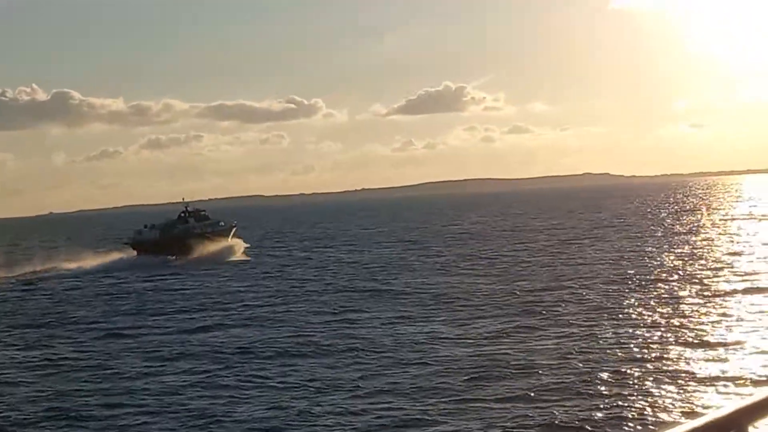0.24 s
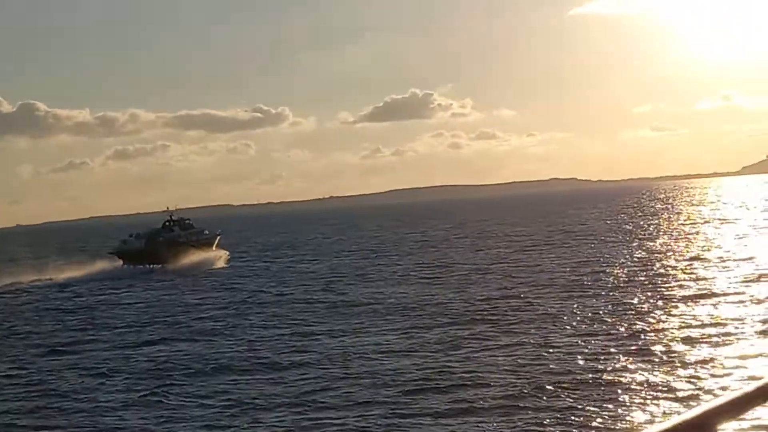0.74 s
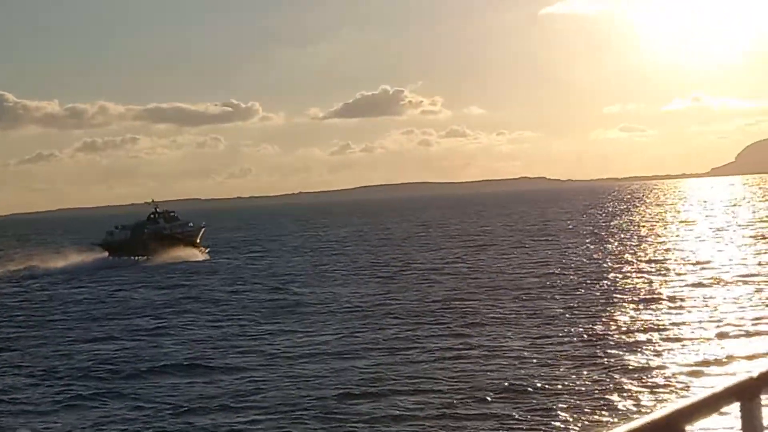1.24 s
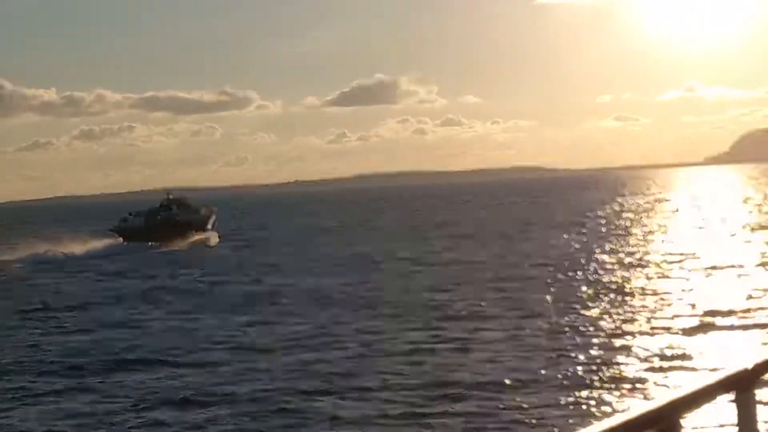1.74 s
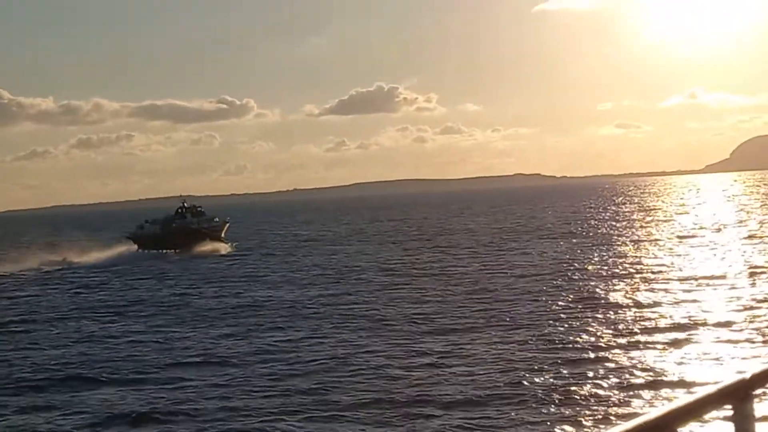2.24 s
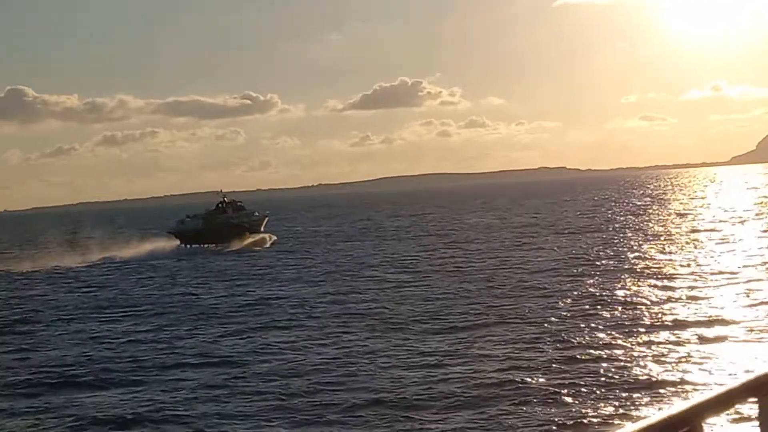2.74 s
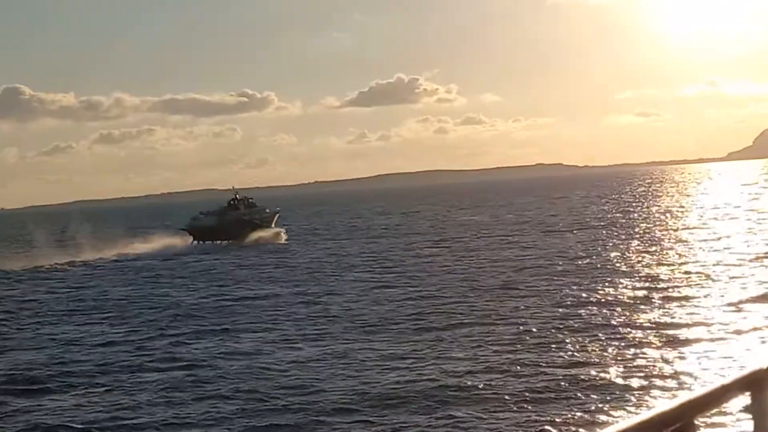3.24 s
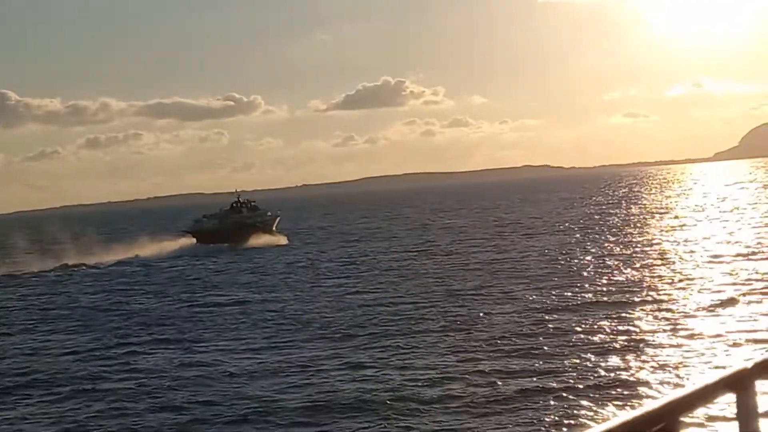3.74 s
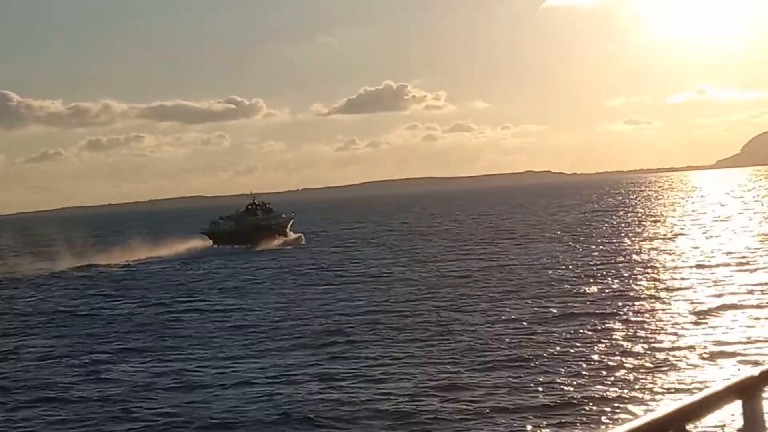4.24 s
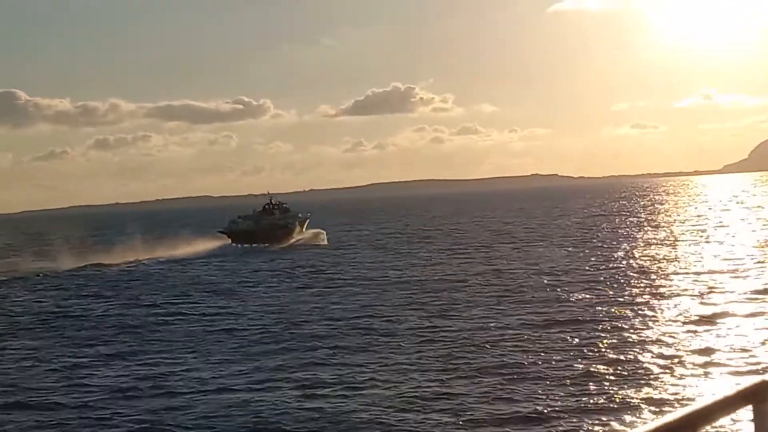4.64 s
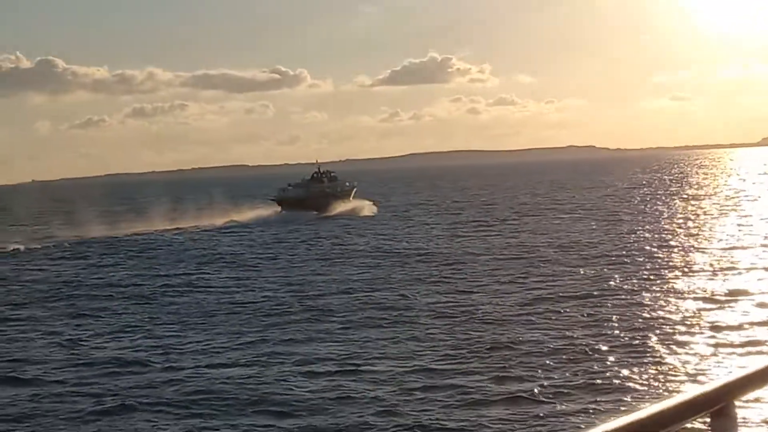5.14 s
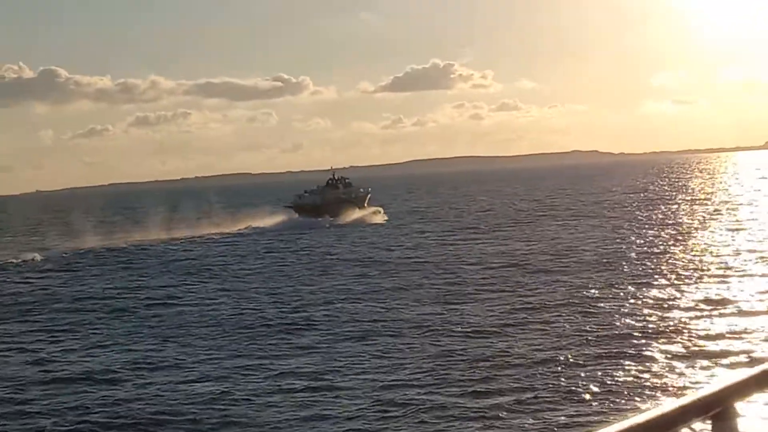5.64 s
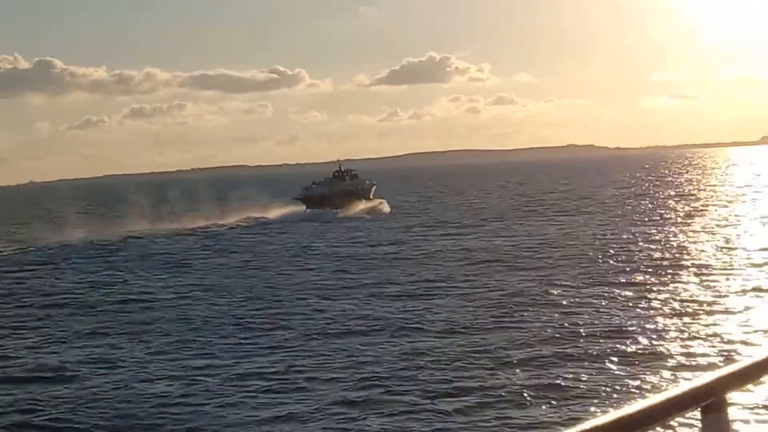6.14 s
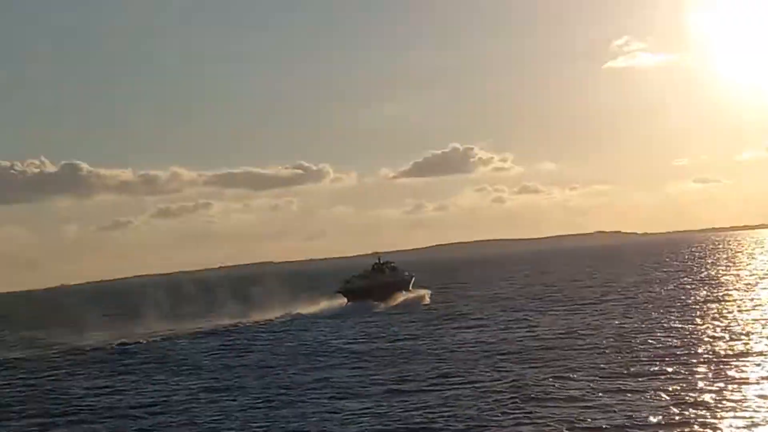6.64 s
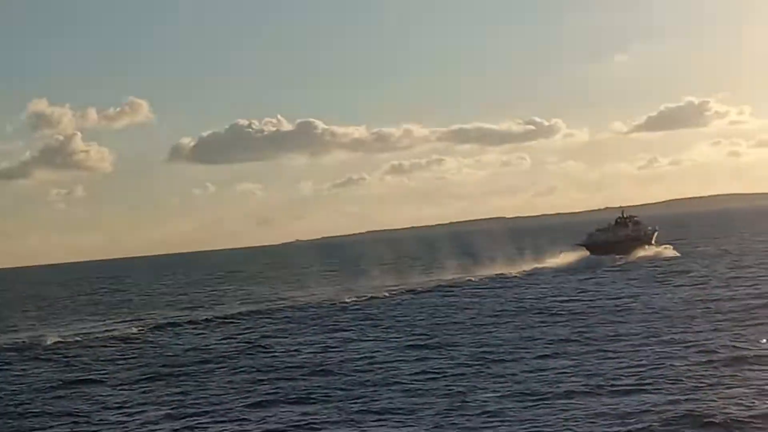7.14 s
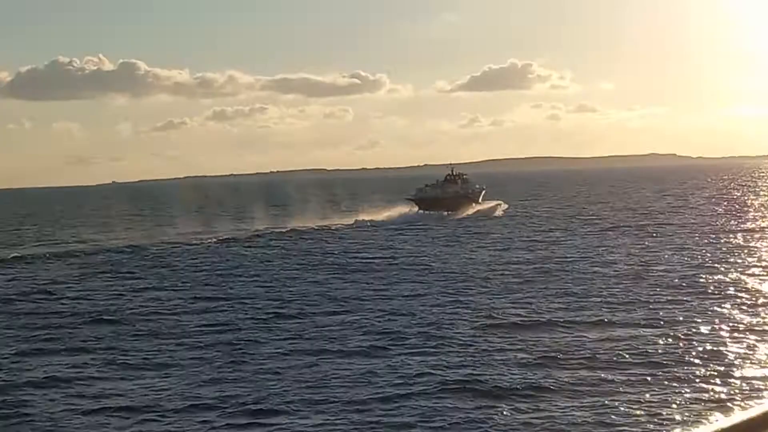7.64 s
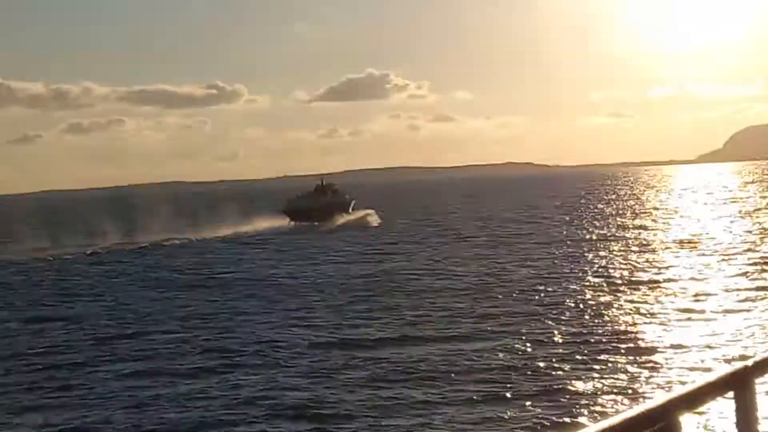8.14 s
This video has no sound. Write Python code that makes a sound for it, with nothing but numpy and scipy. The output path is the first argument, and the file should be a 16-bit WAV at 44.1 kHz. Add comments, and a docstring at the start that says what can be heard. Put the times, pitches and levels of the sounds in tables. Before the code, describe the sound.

A low diesel drone throbs steadily aboard a ship while wind rumbles and thumps, hardest in the first second, with soft wash along the hull.

```python
"""The open deck of a moving ship: two main diesels, a few rpm apart, beat slowly against each other.
Engines and generator are sums of shaft-locked sines; funnel and ventilators roar in shaped noise.
The wash hisses along the hull as patchy noise, unrelated between left and right.
Gusts rumble on the microphone as lumpy low noise and slap its windward left port
with short knocks built from random pressure spikes."""
import sys
import numpy as np
from scipy import signal
from scipy.fft import rfft, irfft, next_fast_len
from scipy.io import wavfile
from scipy.ndimage import uniform_filter1d, minimum_filter1d, map_coordinates

SR = 44100
rng = np.random.default_rng(int(sys.argv[2]) if len(sys.argv) > 2 else 0)


def master(y):
    """Save y as 16-bit WAV."""
    cut = np.clip(np.atleast_2d(y).T, -1, 1)
    pcm = np.round(cut * 32767)  # scale
    wavfile.write(sys.argv[1], SR, pcm.astype(np.int16))


N = 370422

# shaft speeds of the main engines: (time [s], first engine [rpm], second engine [rpm])
ENGINE_SPEEDS = [(0, 970.0, 963.1), (1.4, 969.1, 961.1), (2.8, 969.0, 960.1), (4.2, 969.9, 964.7),
                 (5.6, 970.8, 963.4), (7.0, 967.3, 960.4), (8.4, 969.7, 960.9)]
# breeze between the gusts: level, depth of its swing
BREEZE_DB, BREEZE_SWING_DB = -31.5, 1.6


def amp(db):
    """Decibels to gain."""
    return 10 ** (np.asarray(db) / 20)


def unit(x):
    """Scale to rms 1, over all channels together."""
    return x / np.sqrt(np.mean(x ** 2) + 1e-20)


def along(points, hz):
    """Read (frequency, value) points on a log frequency axis."""
    point_hz, values = np.transpose(points)
    return np.interp(np.log(hz + 1), np.log(point_hz + 1), values)


def curves(rows):
    """Draw a table as automation: one value per sample for each column after the time."""
    seconds, *columns = np.transpose(rows)
    t = np.arange(N) / SR
    return [np.interp(t, seconds, column) for column in columns]


def wobble(rate):
    """A smooth random curve with `rate` knots a second."""
    knots = rng.standard_normal(int(N * rate / SR) + 4)
    coarse = np.linspace(0, N, 4096)
    smooth = map_coordinates(knots, [coarse * rate / SR])
    return np.interp(np.arange(N), coarse, smooth)


def filtered(x, response):
    """Multiply the spectrum of x by a response of frequency; padding keeps the end off the start."""
    size = x.shape[-1]
    padded = next_fast_len(size + SR // 10)
    hz = np.fft.rfftfreq(padded, 1 / SR)
    return irfft(rfft(x, padded) * response(hz), padded)[..., :size]


def noise(spectrum, channels):
    """Unrelated noises with the given spectrum, scaled to rms 1."""
    white = rng.standard_normal((channels, N))
    return unit(filtered(white, lambda hz: amp(along(spectrum, hz))))


def tones(orders, turns, drift=None):
    """Sines locked to a shaft; with drift (radians) each one wanders about a phase of its own."""
    out = np.zeros(N)
    for order, db in orders:
        wander = 0
        if drift is not None:
            wander = 2 * np.pi * rng.random() + drift * wobble(1.994)
        out += amp(db) * np.sqrt(2) * np.cos(2 * np.pi * order * turns + wander)
    return out


def wash():
    """Foam along the hull: a broad hiss, unrelated between the ports, in drifting patches they share."""
    # slow swell of the hiss: (time [s], level [dB])
    swell = [(0, -44), (.5, -49.5), (1.6, -47.5), (3, -44.5), (4.3, -47.5), (4.9, -46), (5.4, -48),
             (5.8, -45.5), (6.3, -46.5), (7.5, -45), (8.4, -46.5)]
    # spectrum of the foam: (frequency [Hz], relative density [dB per Hz])
    foam = [(150, -8), (500, 5.5), (900, 4), (1250, 2), (1700, -4.5), (2700, -5), (3600, -10.5),
            (6000, -17.5), (8000, -20), (10700, -21.5), (13000, -17.5), (15600, -21.5)]
    # tilt of the hiss between the ports: (frequency [Hz], left minus right [dB])
    lean = [(60, -3), (110, 2.5), (200, -2.5), (380, -6), (700, 1.5), (1290, 1.5), (2380, -2), (4400, -3.5),
            (8120, 0.5), (15000, 1)]
    spectra = signal.stft(noise(foam, channels=2), nperseg=512)[2]
    # smooth over frequency bins, then over time frames
    patches = rng.standard_normal(spectra.shape[1:])
    patches = uniform_filter1d(patches, size=8, axis=0)
    patches = uniform_filter1d(patches, size=16, axis=1)
    hiss = signal.istft(spectra * amp(.9 * unit(patches)), nperseg=512)[1][:, :N]
    hiss = filtered(hiss, lambda hz: amp(np.outer([1, -1], along(lean, hz)) / 2))
    return amp(curves(swell)[0]) * unit(hiss)


def funnel():
    """Exhaust and ventilator roar: noise alike at both ports, pulsing three times a turn of the first engine."""
    # roar before its random wobble: (time [s], level [dB])
    vents = [(0, -27), (1, -30), (2, -30.5), (3.2, -26.5), (4, -30), (5.2, -30), (6.2, -29), (7, -29),
             (8.4, -28.5)]
    # spectrum of the roar: (frequency [Hz], relative density [dB per Hz])
    roar = [(20, -25), (40, -14.5), (58, 1.5), (120, 3), (175, -6), (230, 0), (310, -4), (400, -11),
            (550, -17.5), (900, -26.5), (1500, -39), (3000, -67.5)]
    firings = np.cumsum(curves(ENGINE_SPEEDS)[0]) / (20 * SR)
    pulsing = 1 + 0.16 * np.cos(2 * np.pi * firings)
    level_db = curves(vents)[0] + 0.93 * wobble(6)
    return amp(level_db) * pulsing * noise(roar, channels=1)


def generator():
    """Steady shaft tones; the strongest lies nearly 3 Hz above that of the diesels, so the drone throbs."""
    # generator tones by rising multiple, the first is the strongest:
    # (multiple of the shaft speed, level [dB])
    shaft_tones = [(3, -31.4), (3.5, -43), (6, -44), (9, -44), (12, -40), (13, -50), (15, -46)]
    rpm = 1508.5
    turns = np.arange(N) / SR * rpm / 60
    return tones(shaft_tones[:1], turns) + tones(shaft_tones[1:], turns, drift=.2)


def diesel(rpm, start):
    """One main engine: sines at multiples of its four-stroke cycle, which takes two revolutions."""
    # strong exhaust tones: (multiple of the cycle, relative level [dB])
    exhaust = [(9, -19.5), (12, -25)]
    # weaker tones from unequal cylinders: (multiple of the cycle, relative level [dB])
    uneven = [(6, -47), (7, -44), (10, -38), (11, -46), (13, -37.5), (14, -46), (15, -36), (17, -41.5),
              (19, -39.5), (24, -52), (26, -43), (28, -46.5), (29, -47.5), (31, -50), (33, -49.5),
              (36, -52), (38, -50.5), (39, -54), (54, -58), (61, -62.5)]
    cycles = start + np.cumsum(rpm) / (120 * SR)
    return tones(exhaust, cycles) + tones(uneven, cycles, drift=.25)


def engines():
    """The two diesels slide in and out of step, so each tone swells and fades at its own rate."""
    # level of both engines together, dipping early and then recovering: (time [s], gain [dB])
    engine_level = [(0, 0), (.7, -3), (1.4, -1.5), (2.2, -0.5), (3, -.5), (4, -0.5), (5, -.5), (6, -0.5),
                    (7, 1), (8.4, -0.5)]
    first_rpm, second_rpm = curves(ENGINE_SPEEDS)
    first = diesel(first_rpm, start=.581)
    second = diesel(second_rpm, start=.499)
    return amp(curves(engine_level)[0]) * (first + amp(-2.0) * second)


def gust_strength():
    """Wind level in dB at each port: every gust is a bell-shaped swell whose power adds to the restless breeze."""
    # swells over the breeze:
    # (peak time [s], level at the left port [dB], half length [s], shelter of the right port [dB])
    gusts = [(0.165, -19.5, .03, 8), (0.308, -17.5, .06, 6.5), (.415, -12, .025, 14.5),
             (0.496, -20, 0.021, 9.5), (0.654, -21.5, .04, 10.5), (0.724, -14, .045, 13),
             (.95, -18.5, .045, 5), (1.077, -21, .04, 3), (1.47, -23.5, .05, 5), (1.625, -24.5, .04, 3.5),
             (2.219, -22.5, .035, 3.5), (3.012, -19, .045, 2), (4.032, -15.5, .18, -0.5),
             (4.425, -24.5, .1, 2), (5.96, -22, .03, 4), (6.724, -21.5, .045, 0.5)]
    t = np.arange(N) / SR
    breeze = amp(BREEZE_DB + BREEZE_SWING_DB * wobble(4))
    power = np.ones((2, 1)) * breeze ** 2
    for peak, db, half_length, shelter_db in gusts:
        bell = np.exp(-np.minimum(np.abs(t - peak) / half_length, 10) ** 2)
        power += (amp([[db], [db - shelter_db]]) * bell) ** 2
    return 10 * np.log10(power)


def wind(gust_db, rumble_db=-4, flutter_db=-20, growth=1.25):
    """Each port has its own lumpy turbulence noise, as strong as the wind that reaches it."""
    # spectrum of the rumble: (frequency [Hz], relative density [dB per Hz])
    turbulence = [(15, -43.5), (28, -25.5), (58, 6.5), (90, -2), (140, 2.5), (180, -4), (240, -3.5),
                  (400, -18.5), (700, -29), (1500, -69.5)]
    # spectrum of the fine eddies: (frequency [Hz], relative density [dB per Hz])
    fine_eddies = [(60, -25), (130, -1.5), (260, 1), (420, -9), (700, -19), (1200, -30), (2500, -57)]
    excess_db = gust_db - BREEZE_DB
    lumps = amp(3.5 * np.array([wobble(45), wobble(45)]))
    rumble = amp(rumble_db + excess_db) * unit(lumps * noise(turbulence, channels=2))
    # small eddies grow faster than large ones, so a gust sounds brighter than a lull
    flutter = amp(flutter_db + growth * excess_db) * unit(lumps * noise(fine_eddies, channels=2))
    return amp(BREEZE_DB) * (rumble + flutter)


def small_eddies(gust_db, count=44):
    """Random soft slaps, crowding where the wind is strong; a stronger one is also brighter."""
    under_gust_db, length = -3, 0.0107  # level against the gust, seconds
    breeze_hz, db_per_octave = 148, 18.5  # brightness at breeze strength; added strength that doubles it
    above_breeze = np.maximum(amp(gust_db) - amp(BREEZE_DB), 0)
    passed = np.cumsum(above_breeze ** 2)
    # equal shares of the passing wind each hold one eddy
    shares = (np.arange(count) + rng.random(count)) / count
    at = np.searchsorted(passed, passed[-1] * shares)
    levels_db = gust_db[at] + under_gust_db
    bright_hz = breeze_hz * 2 ** ((levels_db - BREEZE_DB) / db_per_octave)
    return [(i / SR, db, length, hz) for i, db, hz in zip(at, levels_db, bright_hz)]


def slaps(eddies, spike_rate=900, spread=0.53, low_cut_hz=80, reach=2.33, spill_db=-22):
    """An eddy is a few sharp pressure swings in a row; the narrower they are, the brighter it knocks."""
    out = np.zeros(N + SR)
    t = np.arange(-(SR // 20), SR // 20) / SR
    low_cut = signal.butter(2, low_cut_hz, "high", fs=SR, output="sos")
    for time, db, length, bright_hz in eddies:
        count = max(3, round(length * spike_rate))
        when = ((np.arange(count) + rng.random(count)) / count - .5) * length
        scatter = np.exp(spread * np.clip(rng.standard_normal(count), -1, 2))
        width = scatter / (2 * np.pi * bright_hz)
        # pressure turns to suction along the eddy
        swing = np.sin(2 * np.pi * when / length + rng.normal(0, 1.0, count))
        push = rng.choice([-1, 1]) * swing
        spikes = 1 / (1 + ((t - when[:, None]) / width[:, None]) ** 2)
        pressure = push @ spikes
        # the smallest swirls die out in the air, and the port drops the lowest bass
        damping = signal.butter(1, reach * bright_hz, fs=SR, output="sos")
        burst = signal.sosfilt(low_cut, signal.sosfilt(damping, pressure))
        burst *= amp(db) * np.sqrt(length * SR) / np.linalg.norm(burst)
        first = max(round((time + t[0]) * SR), 0)
        out[first:][:len(t)] += burst
    # the right port hears only the spill
    return out[:N] * amp([[0], [spill_db]])


def scene():
    """The ship's drone is nearly mono and reaches the right port first; water and wind spread around it."""
    # the hardest eddies that strike the left port:
    # (time [s], level [dB], length [s], brightness [Hz])
    hard_eddies = [(.161, -10, 0.0058, 280), (.275, -18, 0.0053, 290), (.403, -11.5, .008, 380),
                   (.413, -12.5, .011, 230), (.426, -10, 0.012, 330), (.49, -12, 0.0076, 190),
                   (.63, -20, 0.0038, 300), (.686, -17, 0.0069, 340), (.699, -14.5, 0.011, 340),
                   (.709, -9, .0092, 370), (.727, -15, .016, 480), (.749, -9, .008, 310),
                   (.959, -11, 0.0105, 278), (1.07, -16, 0.00934, 220), (1.443, -12.5, 0.008, 270),
                   (3.945, -15, .013, 160), (4.05, -18, 0.019, 380), (4.175, -15.5, .012, 357),
                   (4.195, -18, .013, 209)]
    drone = funnel() + generator() + engines()
    lag = 1e-4  # seconds from right port to left
    sides = np.array([[1], [-1]])
    ship = filtered(drone, lambda hz: np.exp(-1j * np.pi * hz * lag * sides))
    ship = ship * amp(.3 * sides)
    gust_db = gust_strength()
    knocks = slaps(hard_eddies + small_eddies(gust_db[0]))
    return wash() + ship + wind(gust_db) + knocks


def record(dry):
    """A limiter holds peaks under a ceiling, the ends fade briefly, and nothing is kept above the band limit."""
    ceiling, top_hz = .95, 15700
    needed = np.minimum(1, ceiling / (np.abs(dry) + 1e-9))
    # hold the lowest gain around each peak, then smooth it (sizes in samples)
    gain = uniform_filter1d(minimum_filter1d(needed, size=221), size=201)
    fade = signal.windows.tukey(N, .001)
    return filtered(dry * gain * fade, lambda hz: hz < top_hz)


dry = scene()
out = record(dry)
master(out)
```